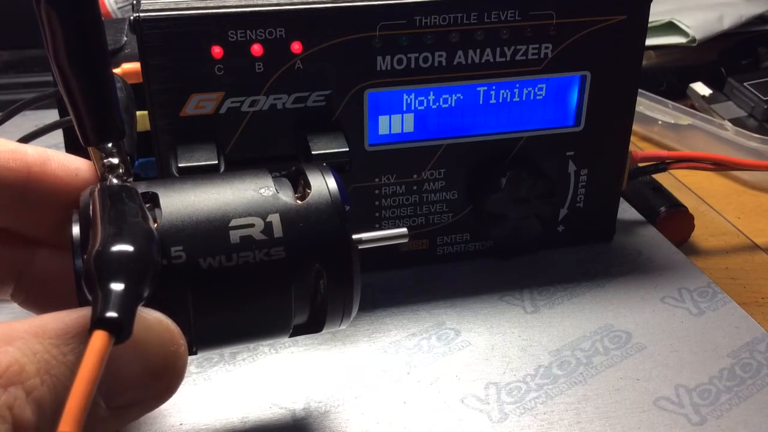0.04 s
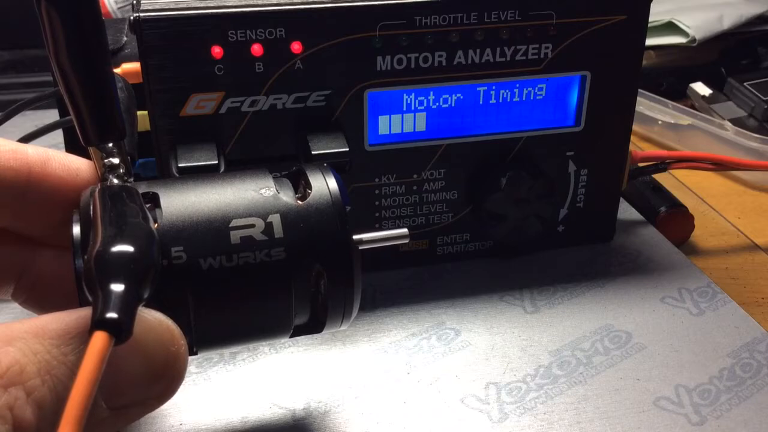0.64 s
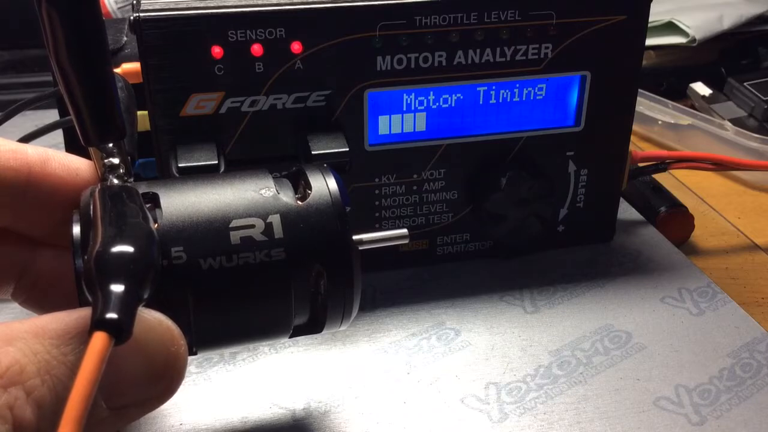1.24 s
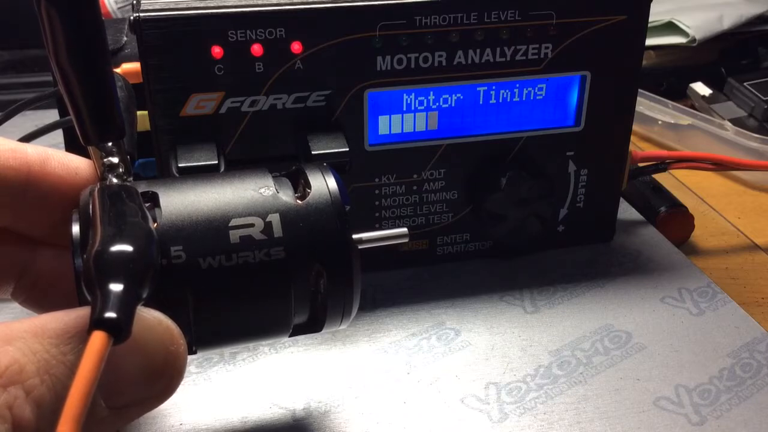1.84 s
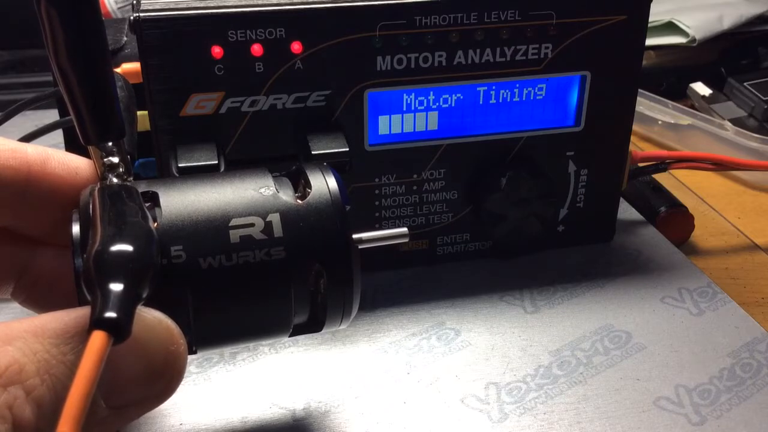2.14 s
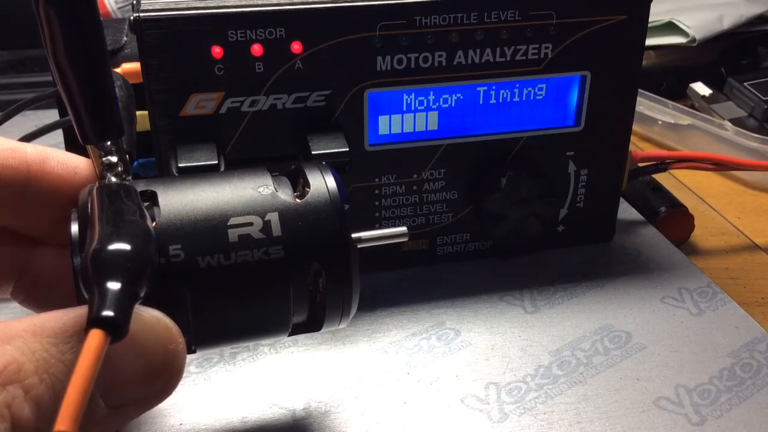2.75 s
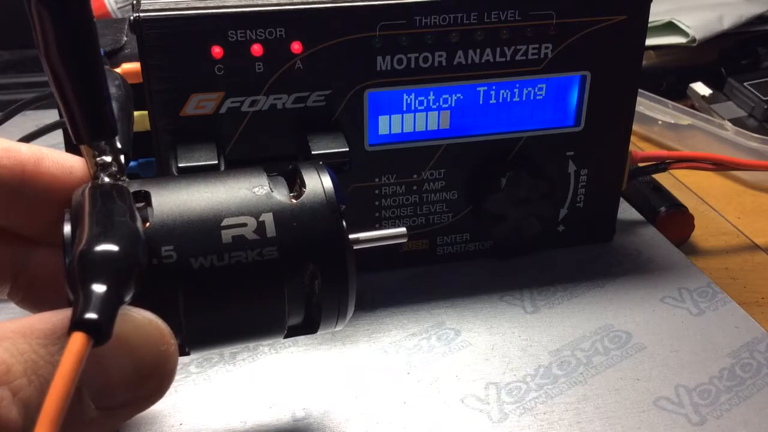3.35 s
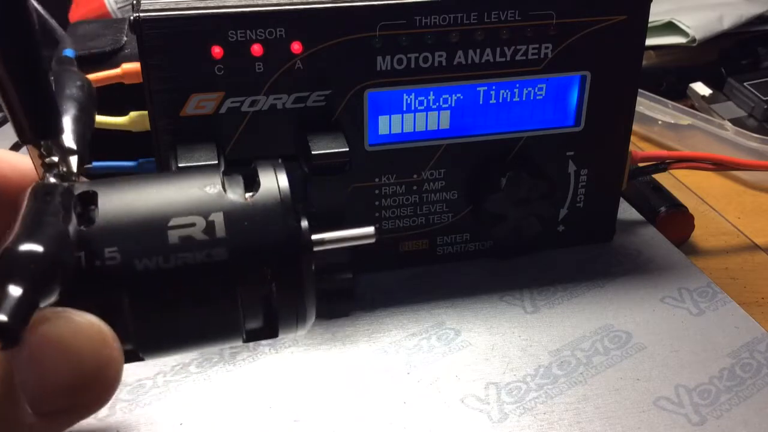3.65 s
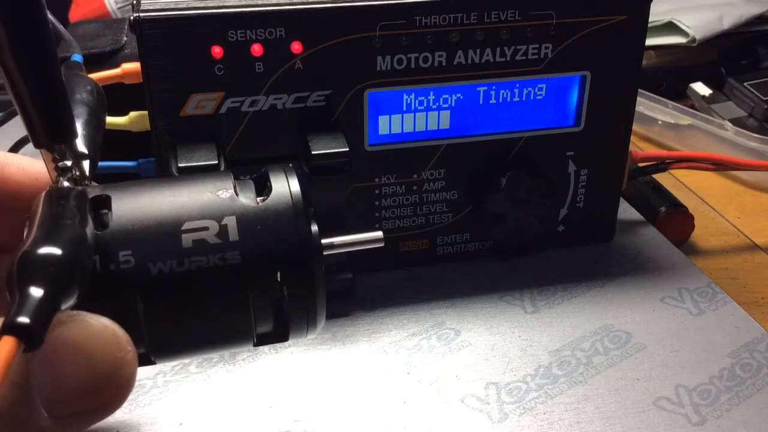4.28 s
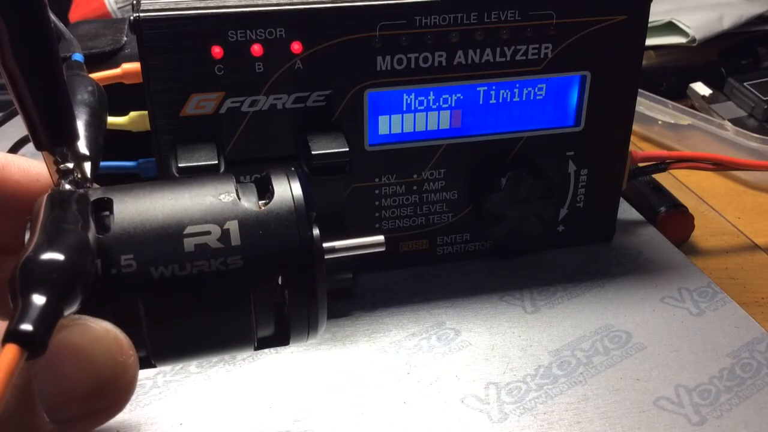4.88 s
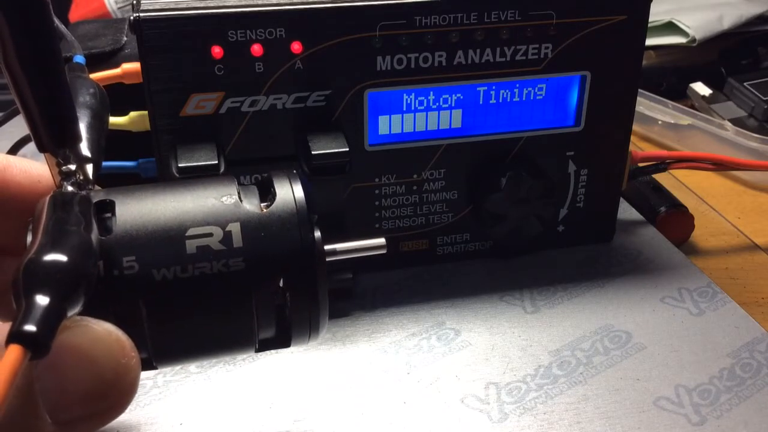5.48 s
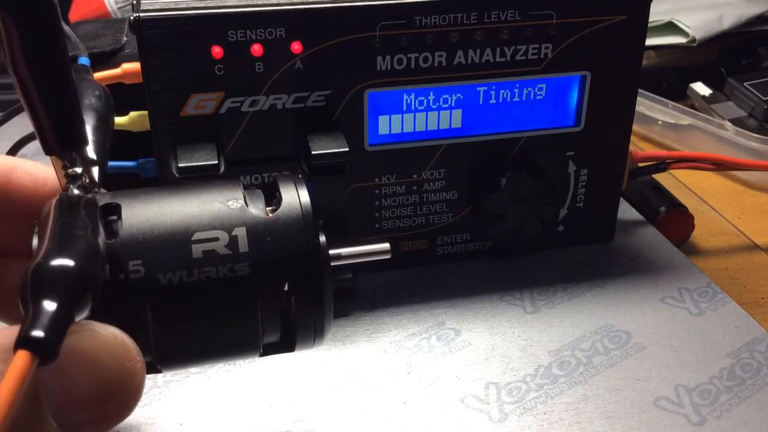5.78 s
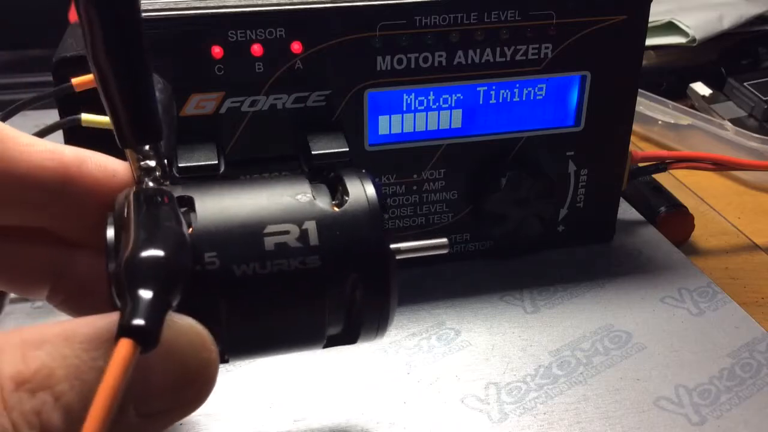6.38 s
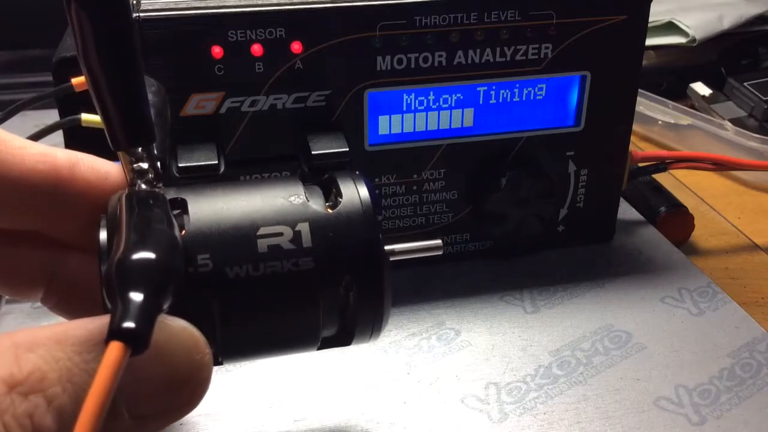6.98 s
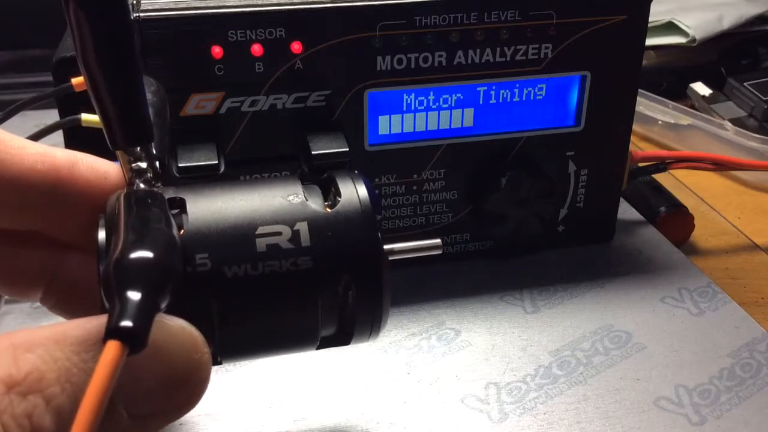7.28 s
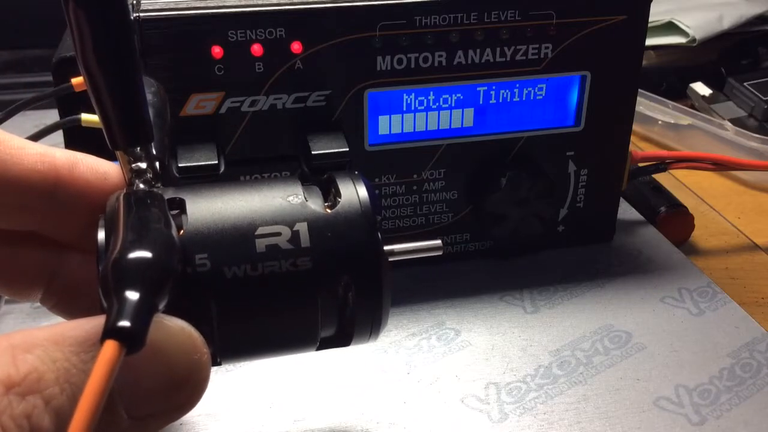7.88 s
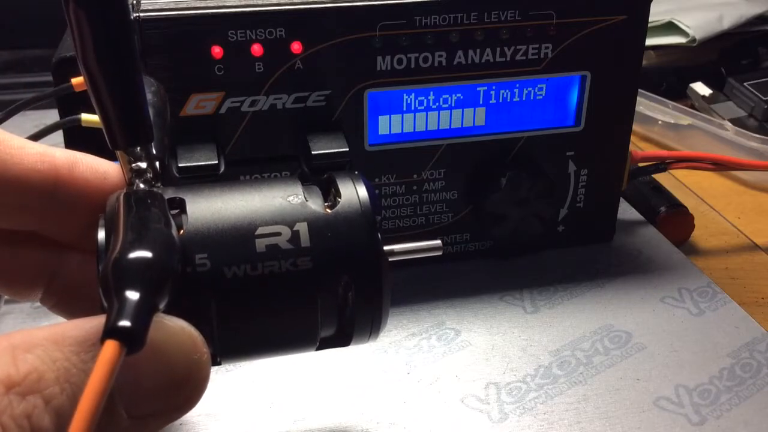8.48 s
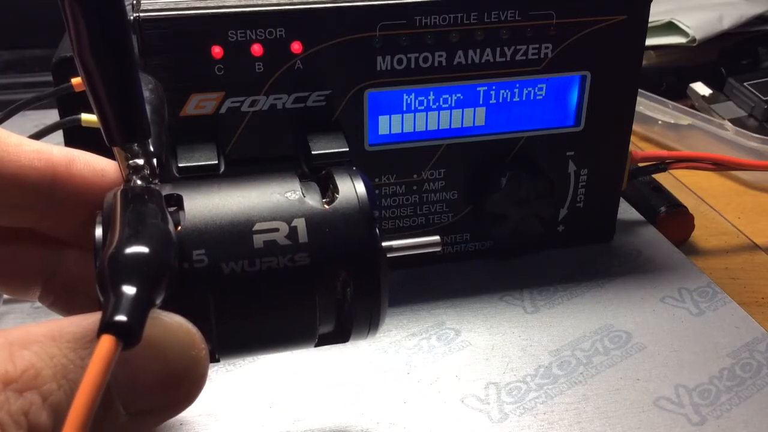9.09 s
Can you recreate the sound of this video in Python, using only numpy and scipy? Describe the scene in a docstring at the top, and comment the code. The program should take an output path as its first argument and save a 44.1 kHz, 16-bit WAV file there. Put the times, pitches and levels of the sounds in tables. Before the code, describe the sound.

A small brushless electric motor runs freely at constant high speed, giving a steady, high-pitched whine with a bright, fine bearing rasp. Some of its tones throb gradually faster. The hand holding it shifts twice, slightly changing the colour of the treble, with faint finger rubbing and a few soft bumps in the second half. The motor is heard close up in a quiet workshop.

```python
"""A small brushless motor runs unloaded at about 8000 rpm on a bench tester, held in one hand.
The rotor sings its shaft orders; the bearings add in-between tones and a bright rasp. The electronics
add a fixed whine and a chopper tone that creeps upward and beats ever faster against the rotor.
The hand shifts twice, which recolours the treble, and rubs and bumps softly in a quiet room."""
import sys
import numpy as np
from scipy import signal
from scipy.fft import rfft, irfft, next_fast_len
from scipy.io import wavfile

SR = 44100
rng = np.random.default_rng(int(sys.argv[2]) if len(sys.argv) > 2 else 0)


def generate_wav(sig):
    """Save sig (samples, or channels by samples) to the path in sys.argv[1] as 16-bit PCM at SR."""
    pcm = np.round(np.clip(np.atleast_2d(sig).T, -1, 1) * 32767).astype(np.int16)
    wavfile.write(sys.argv[1], SR, pcm)


N = 402633
TIME = np.arange(N) / SR
SHAFT_HZ = 134.497
# Resonances of can and end bells. Each row: centre in Hz, width in Hz, level in dB in grips 0, 1 and 2.
CASING = [(1523,230,-95,-95.5,-95),(2120,760,-96.5,-97.5,-96.5),(2635,260,-93.5,-92.5,-93),(3130,510,-98,-97.5,-99),(3700,850,-96.5,-96,-95.5),(4340,410,-88.5,-90.5,-89),(5080,640,-85,-84,-83.5),(6030,260,-89.5,-87,-91),(6570,290,-94,-88,-86.5),(7320,1020,-82,-83,-81.5),(7840,660,-79.5,-83.5,-81.5),(8130,690,-95,-83.5,-80.5),(8800,800,-84,-83.5,-87),(9760,270,-86,-100,-96),(10200,570,-81.5,-81,-78.5),(10600,450,-99,-80.5,-91),(11260,770,-81.5,-81,-80),(12100,490,-82.5,-81,-83),(12900,360,-90,-85,-89),(13560,730,-82.5,-80.5,-83.5),(14400,403,-83.5,-100,-98),(15326,680,-94,-85.5,-89)]


def from_db(db):
    """Decibels to gain."""
    return np.exp(np.asarray(db) * (np.log(10) / 20))


def unit_rms(x):
    """Scale to unit power."""
    return x / np.sqrt(np.mean(x ** 2) + 1e-20)


def shaped(x, gain_at):
    """Filter a steady sound by a gain that is a function of frequency."""
    size = next_fast_len(N, True)
    hz = np.maximum(np.arange(size // 2 + 1) * SR / size, 1)
    return irfft(rfft(x, size) * gain_at(hz), size)[:N]


def white():
    """Noise of 0 dB per Hz."""
    return rng.standard_normal(N) * np.sqrt(SR / 2)


def drift(rate_hz):
    """Random wander of spread 1: noise through two one-pole low-passes."""
    hop, settle = 40, 2000
    pole = np.exp(-2 * np.pi * hop * rate_hz / SR)
    noise = rng.standard_normal(N // hop + settle + 2)
    slow = signal.lfilter([1], [1, -2 * pole, pole * pole], noise)[settle:]
    return np.interp(np.arange(N) / hop, np.arange(len(slow)), unit_rms(slow))


def swell(start, length, attack_s, release_s):
    """Attack, hold and release between 0 and 1."""
    return np.clip(np.minimum((TIME - start) / attack_s, (start + length - TIME) / release_s), 0, 1)


def bell(hz, centre_hz, width_hz):
    """Gain of a steep-sided resonance, 1 on top."""
    return (1 + (2 * (hz - centre_hz) / width_hz) ** 2) ** -.75


def notch(hz, centre_hz, width_hz, depth_db):
    """Gain of a narrow dip, or a lift if depth_db is positive."""
    offset = 2 * (hz - centre_hz) / width_hz
    return np.sqrt(1 - (1 - from_db(2 * depth_db)) / (1 + offset ** 4))


def room():
    """Low, even background of the workshop."""
    # Room tone. Each row: frequency in Hz, level in dB per Hz.
    spectrum = [(20,-123),(45,-106),(65,-98.5),(90,-99.5),(145,-96.5),(195,-103),(235,-96.5),(400,-104),(550,-106),(750,-113),(1100,-112),(3000,-118)]
    hz_points, db_points = np.transpose(spectrum)
    return shaped(white(), lambda hz: from_db(np.interp(np.log(hz), np.log(hz_points), db_points)))


def hand(resting_db=-85, grab_db=2.5):
    """Dull rubbing as skin catches and lets go, and a few quickly damped bumps."""
    # Fingers slide on the can and leads. Each row: start in seconds, length in seconds, level in dB.
    rubs = [(.8, 0.56, -83), (2.9, 0.92, -75), (4.72, .35, -73), (5.55, 0.47, -74), (5.947, .65, -70)]
    # Soft knocks. Each row: start in seconds, level in dB, pitch in Hz, seconds to fall by 60 dB.
    bumps = [(5.761, -49, 275, 0.068), (5.791, -47, 328, 0.041), (5.793, -52, 149, .068),
             (7.781, -46.5, 362, 0.027), (7.784, -50.5, 580, .035)]
    friction = unit_rms(shaped(white(), lambda hz: bell(hz, centre_hz=338, width_hz=270)))
    slide_power = sum(from_db(2 * db) * swell(start, length, attack_s=0.078, release_s=0.15)
                      for start, length, db in rubs)
    grabbing = unit_rms(from_db(grab_db * drift(rate_hz=12)))
    out = friction * grabbing * np.sqrt(from_db(2 * resting_db) + slide_power)
    for start, db, hz, t60 in bumps:
        age = np.clip(TIME - start, 0, 1)
        envelope = from_db(db - 60 * age / t60) * (1 - np.exp(-age / 0.0013))
        out += envelope * np.sin(2 * np.pi * hz * age)
    return out


def hand_grip():
    """Grip 0, 1 or 2: each shift of the hand glides on to the next."""
    # The hand moves the motor. Each row: start in seconds, length in seconds.
    shifts = [(3.42, 0.24), (6.05, 0.2)]
    return sum(np.clip((TIME - start) / length, 0, 1) for start, length in shifts)


def by_grip(values, grip):
    """Glide between one value per grip as the hand moves."""
    return np.interp(grip, np.arange(len(values)), values)


def reflections(x, grip):
    """Echoes off bench and tester cancel narrow bands; the notches cross-fade from grip to grip."""
    # Cancellations. Each row: centre in Hz, width in Hz, gain in dB in grips 0, 1 and 2.
    nulls = [(730,110,-11,1,-7),(2370,87,-6,2,-7),(3640,214,-11,-18,-15),(5600,190,-8,2,2),(8500,180,-4,-2,0),(8920,120,-8,1.5,-6),(9400,220,-0.5,-6,0),(12300,180,-4,-2,-10),(14560,300,-4,-22,-6),(14860,340,-22,2,-20)]
    out = 0
    for k, weights in enumerate(np.eye(3)):
        notched = shaped(x, lambda hz: np.prod(
            [notch(hz, centre, width, dbs[k]) for centre, width, *dbs in nulls], axis=0))
        out += by_grip(weights, grip) * notched
    return out


def casing_tone(colour_hz, level_db, cycles, grip):
    """A sine that swells or fades as the casing turns its resonances at colour_hz to the microphone."""
    power = sum((from_db(dbs) * bell(colour_hz, centre, width)) ** 2 for centre, width, *dbs in CASING)
    facing = by_grip(from_db(level_db) * np.sqrt(2 * power / power.mean()), grip)
    phase = (cycles % 1).astype(np.float32) + rng.random()
    return facing * np.sin(2 * np.pi * phase)


def chopper_whine(turns, grip, gain_db, beat_start_hz=4.8, doubling_s=4.6, wander_hz=1.1):
    """The warming chopper creeps out of step with the shaft, so the rotor tones throb ever faster."""
    # Chopper tones mixed with the rotation. Each row: rough shaft multiple, chopper harmonic, level in dB.
    partials = [(8,1,-80),(9,1,-86.5),(10,1,-79),(11,1,-75.5),(12,1,-70),(13,1,-86.5),(14,1,-72),(17,1,-78),(18,1,-78),(29.49,1,-70),(31,1,-72.5),(32,1,-79),(32.6,1,-74),(35,1,-74),(37,1,-67),(38,1,-70),(39,1,-69.5),(40,1,-69),(44,1,-68.5),(45,1,-66),(47.9,2,-71),(50.7,1,-72),(52,1,-65),(53,1,-64),(53,2,-64),(55,1,-74),(56.1,1,-69),(57.5,1,-66),(56.7,2,-64.5),(59,2,-70),(60.4,2,-76),(62.4,1,-63.5),(66.4,1,-67),(67.7,1,-66),(75.3,1,-73),(80.8,1,-72),(82.6,-1,-61),(84.4,1,-62.5),(88.2,1,-65)]
    beat_hz = beat_start_hz * 2 ** (TIME / doubling_s) + wander_hz * drift(rate_hz=1.297)
    beats = np.cumsum(beat_hz) / SR
    return sum(casing_tone(order * SHAFT_HZ, db + gain_db, round(order) * turns + harmonic * beats, grip)
               for order, harmonic, db in partials)


def drive_whine(turns, grip, gain_db, switching_hz=7889.45):
    """Commutation splits the switching tone into sidebands at odd shaft multiples."""
    # Each row: offset from the switching tone in shaft multiples, level in dB.
    sidebands = [(-3,-58.5),(-1,-59.5),(1,-57.5),(3,-60),(5,-65)]
    carrier = switching_hz * TIME
    return sum(casing_tone(switching_hz + offset * SHAFT_HZ, db + gain_db, carrier + offset * turns, grip)
               for offset, db in sidebands)


def load_pattern(turns):
    """Bearing load that repeats with every turn; spread 1."""
    angle = np.linspace(0, 2 * np.pi, 257)
    pattern = sum(np.cos(k * angle + rng.uniform(0, 2 * np.pi)) for k in range(2, 10))
    return np.interp(2 * np.pi * (turns % 1), angle, unit_rms(pattern))


def worn_tracks(cage_per_turn=0.3683, count=6):
    """Wavy races and balls: a thicket of tones at sums of shaft and cage rates, as strong as white()."""
    size = next_fast_len(N, True)
    shaft_orders = np.arange(1, int(SR / 2 / SHAFT_HZ) - count)
    orders = shaft_orders[:, None] + cage_per_turn * np.arange(count)
    bins = np.round(orders * SHAFT_HZ * size / SR).astype(int)
    spectrum = np.zeros(size // 2 + 1, complex)
    spectrum[bins] = np.exp(2j * np.pi * rng.random(orders.shape))
    return unit_rms(irfft(spectrum, size)[:N]) * np.sqrt(SR / 2)


def bearing_rasp(turns, grip, pulse_db, band_pulse_db, grain_db, tremor_db,
                 ticks_per_s, tick_db, tonal_share, tonal_below_hz):
    """Rolling contact, pulsed by the load and dotted with grit, rings the casing."""
    load_db = pulse_db * load_pattern(turns) + grain_db * drift(300) + tremor_db * drift(6)
    ticks = rng.random(N) < ticks_per_s / SR
    grit = ticks * rng.uniform(-1.4, 1, N) * from_db(tick_db) * np.sqrt(SR / 2)
    out = 0
    for centre, width, *dbs in CASING:
        # long waves in the metal repeat as the bearing turns; fine roughness does not
        share = max(tonal_share * (1 - centre / tonal_below_hz), 0)
        surface = np.sqrt(1 - share) * white()
        if share:
            surface += np.sqrt(share) * worn_tracks()
        pressure = unit_rms(from_db(load_db + band_pulse_db * (1 - share) * load_pattern(turns)))
        ringing = shaped(surface * pressure + grit, lambda hz: bell(hz, centre, width))
        out += by_grip(from_db(dbs), grip) * ringing
    return reflections(out, grip)


def bearing_tones(turns, grip, gain_db, slip_cycles):
    """Balls roll over the outer race; their cage slips a little."""
    # Ball-pass tones with sidebands a shaft turn apart. Each row: shaft multiple, level in dB.
    partials = [(2.578,-85.5),(4.578,-81.5),(5.578,-97),(6.578,-84.5),(7.578,-88),(10.578,-75.5),(11.578,-72),(13.578,-79.5),(15.578,-80.5),(16.578,-76.5),(18.578,-83),(19.578,-81),(22.578,-77.5),(25.578,-90),(30.578,-67.5),(32.578,-76),(33.578,-79),(34.578,-83),(35.578,-65),(38.578,-67.5),(39.578,-76),(43.578,-77),(60.578,-65)]
    slip = slip_cycles * drift(rate_hz=1.6)
    return sum(casing_tone(order * SHAFT_HZ, db + gain_db, order * turns + slip, grip)
               for order, db in partials)


def rotor(turns, grip, gain_db, flutter_db, flutter_hz):
    """Tones locked to the shaft; the higher ones flutter more."""
    # Shaft orders. Each row: shaft multiple, level in dB.
    partials = [(1,-88),(2,-75.5),(3,-82.5),(4,-69),(5,-83),(6,-83),(7,-73.5),(8,-77),(9,-69),(10,-78.5),(11,-68.5),(12,-71.5),(13,-81),(14,-82.5),(15,-79.5),(16,-68.5),(17,-69.5),(18,-77.5),(19,-77),(20,-64),(21,-66.5),(22,-74),(23,-77.5),(24,-71),(25,-69.5),(26,-78),(29,-63),(30,-66.5),(31,-73.5),(32,-67.5),(33,-62),(34,-67),(35,-65.5),(36,-69.5),(37,-62.5),(38,-69),(39,-60.5),(40,-72),(41,-62),(42,-70),(43,-79),(44,-66.5),(45,-67),(46,-77),(55,-71),(56,-68),(59,-68),(61,-71),(64,-65),(65,-69),(66,-72),(77,-70),(80,-67),(82,-63.5),(83,-63.5),(84,-59.5),(85,-67),(86,-63),(87,-59),(88,-71),(89,-68),(91,-69)]
    wobbles = [drift(flutter_hz) for _ in range(12)]
    out = 0
    for k, (order, db) in enumerate(partials):
        hz = order * SHAFT_HZ
        depth = (from_db(flutter_db) - 1) * min(np.sqrt(hz / 5000), 1)
        flutter = 1 + depth * wobbles[k % len(wobbles)]
        out += flutter * casing_tone(hz, db + gain_db, order * turns, grip)
    return out


def scene():
    """One shaft angle drives all the motor's layers; a single microphone feeds both channels."""
    grip = hand_grip()
    turns = SHAFT_HZ * TIME + 0.0038 * drift(rate_hz=0.67)
    motor = rotor(turns, grip, gain_db=-0.5, flutter_db=1.52, flutter_hz=7.5)
    motor += bearing_tones(turns, grip, gain_db=-0.5, slip_cycles=0.09)
    motor += drive_whine(turns, grip, gain_db=-0.5)
    motor += chopper_whine(turns, grip, gain_db=1.0)
    motor += bearing_rasp(turns, grip, pulse_db=1.5, band_pulse_db=2.5, grain_db=0.8, tremor_db=0.3,
                          ticks_per_s=39, tick_db=3.5, tonal_share=0.62, tonal_below_hz=9900)
    return np.tile(motor + hand() + room(), (2, 1))


def record(dry):
    """A steep low-pass cuts off the highest treble."""
    cutoff_hz = 15300
    return np.array([shaped(channel, lambda hz: 1 / np.sqrt(1 + (hz / cutoff_hz) ** 800))
                     for channel in dry])


dry = scene()
out = record(dry)
generate_wav(out)
```